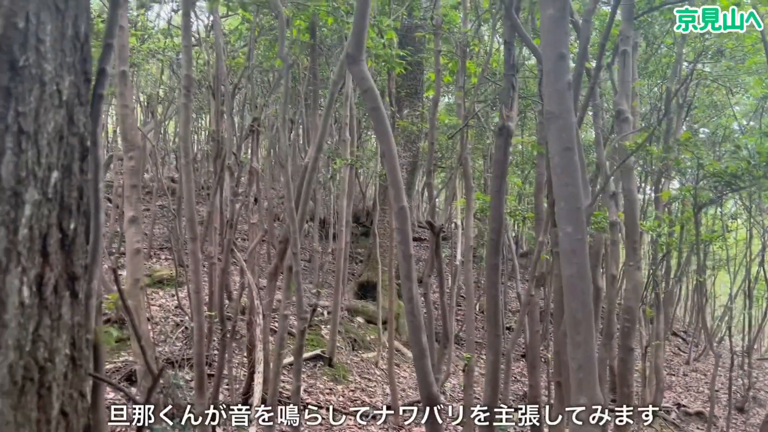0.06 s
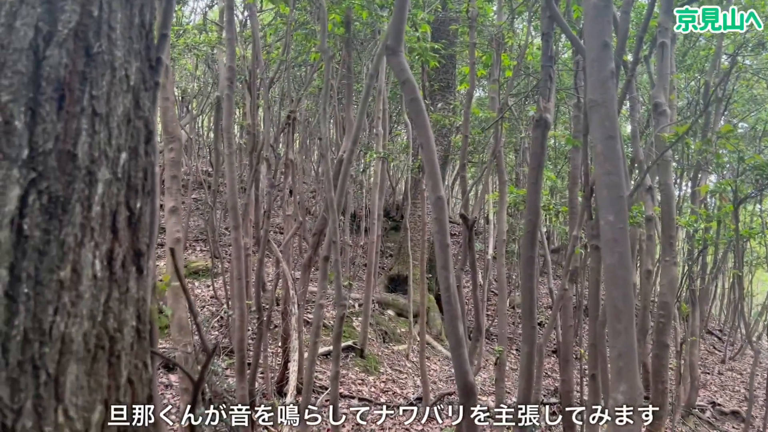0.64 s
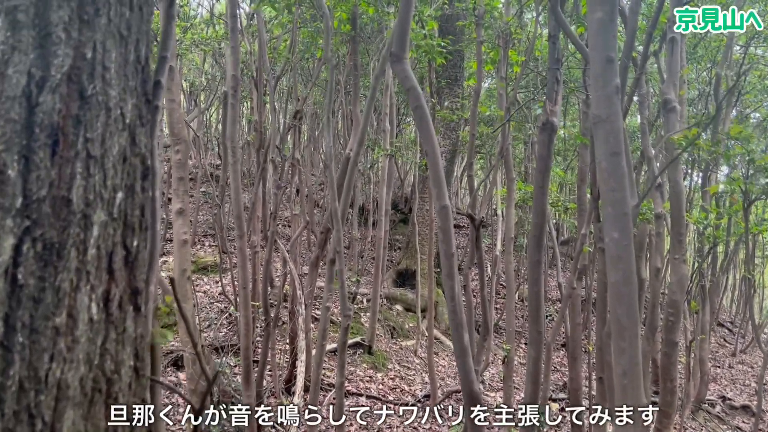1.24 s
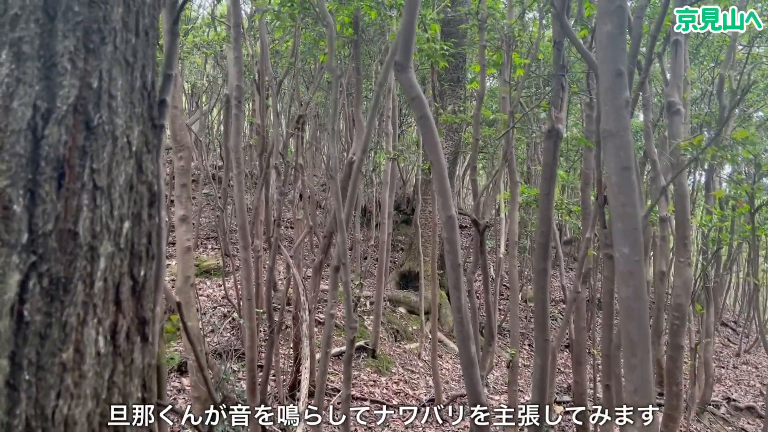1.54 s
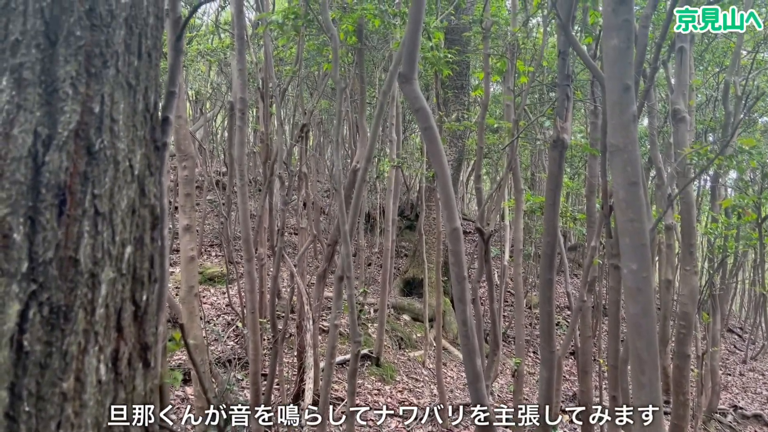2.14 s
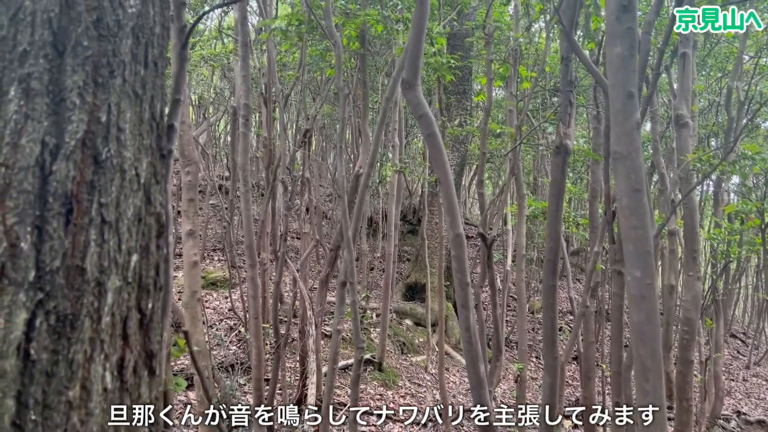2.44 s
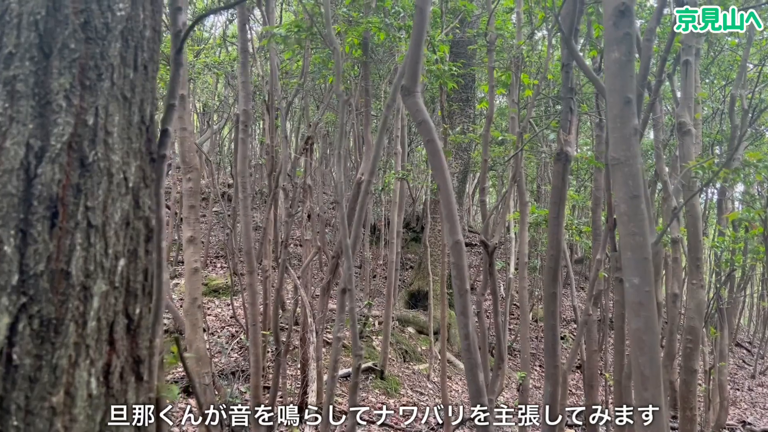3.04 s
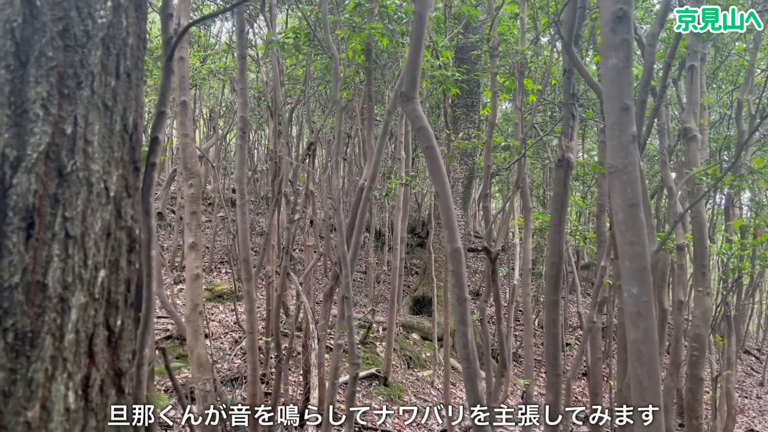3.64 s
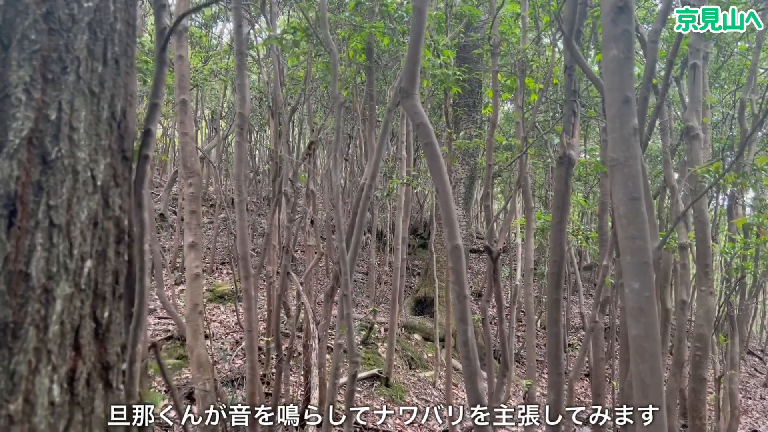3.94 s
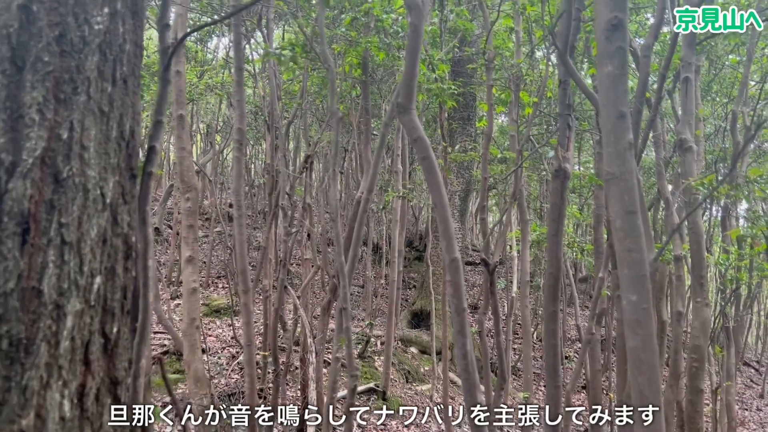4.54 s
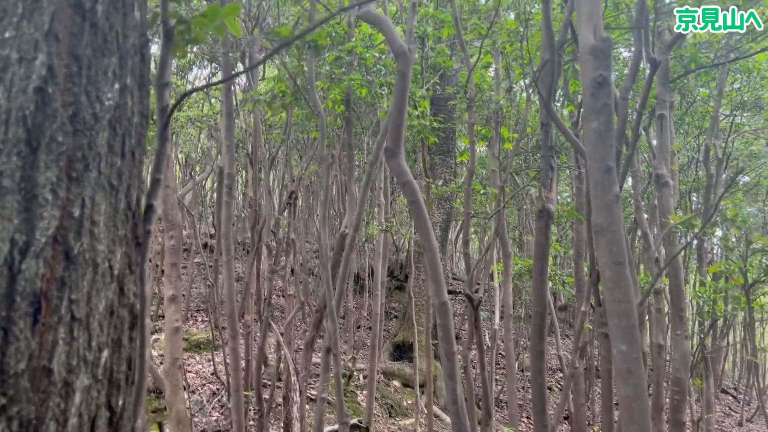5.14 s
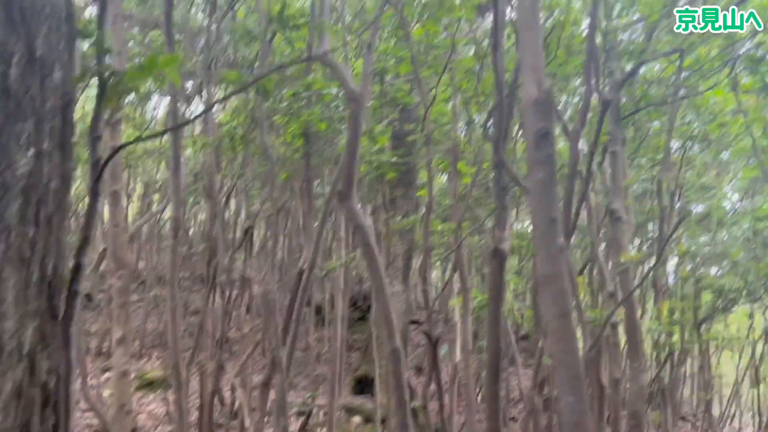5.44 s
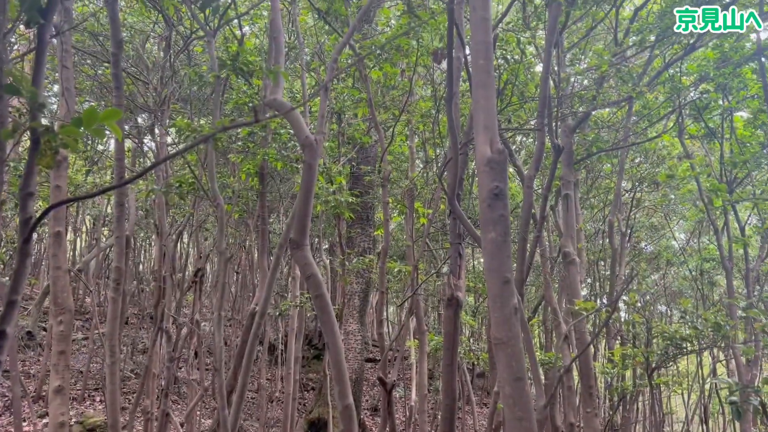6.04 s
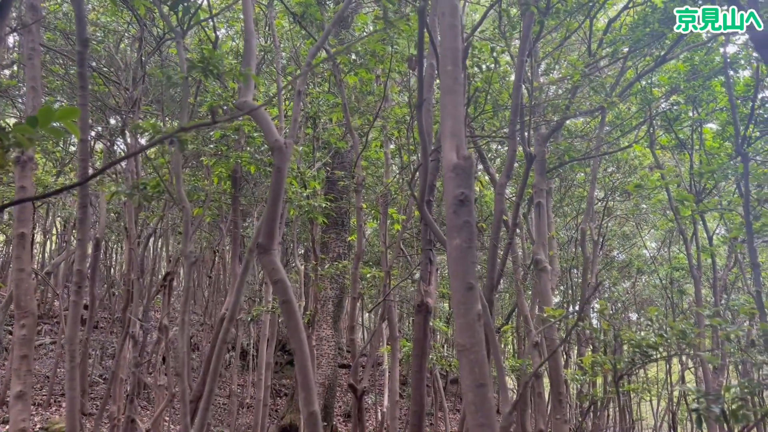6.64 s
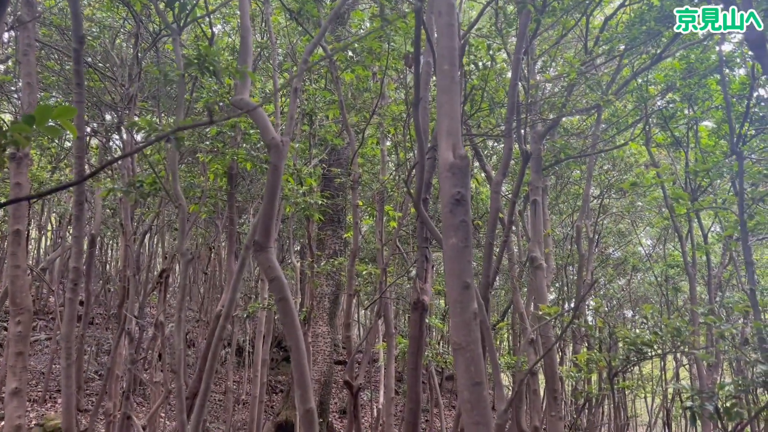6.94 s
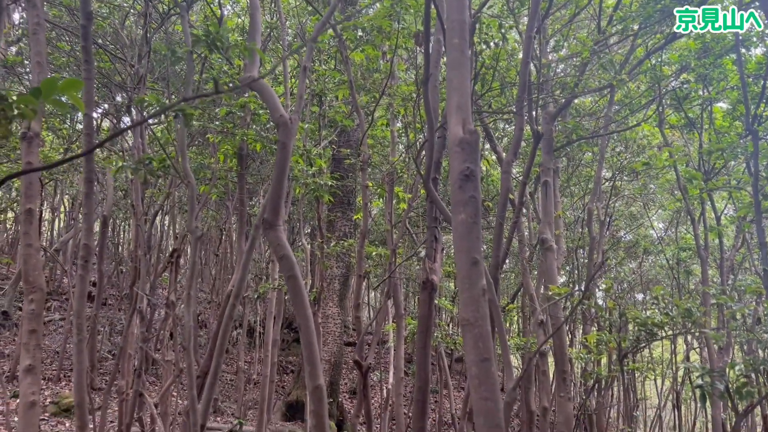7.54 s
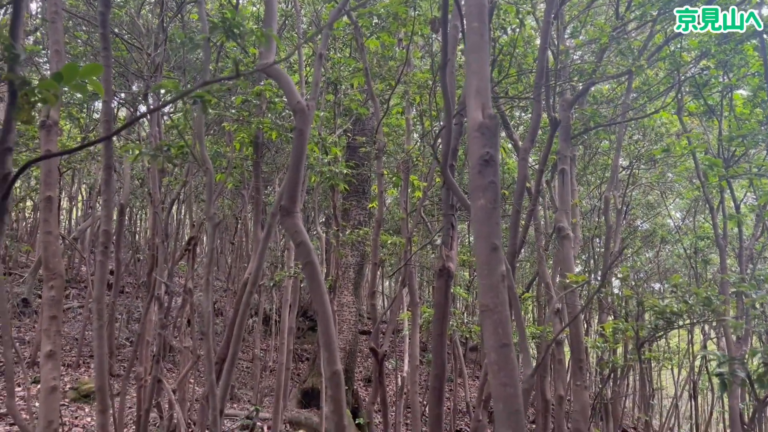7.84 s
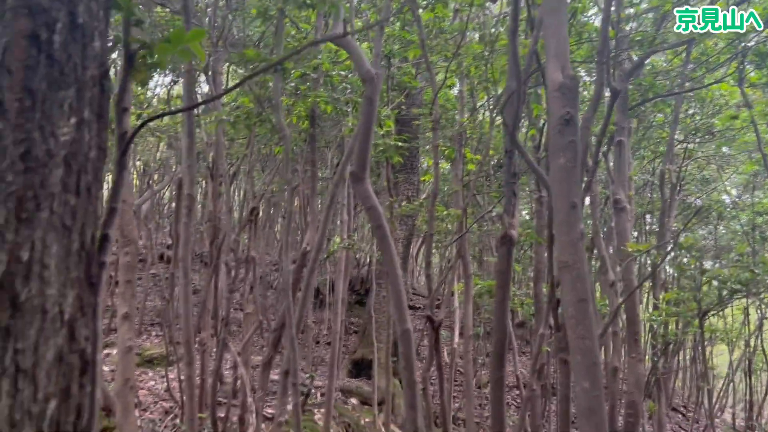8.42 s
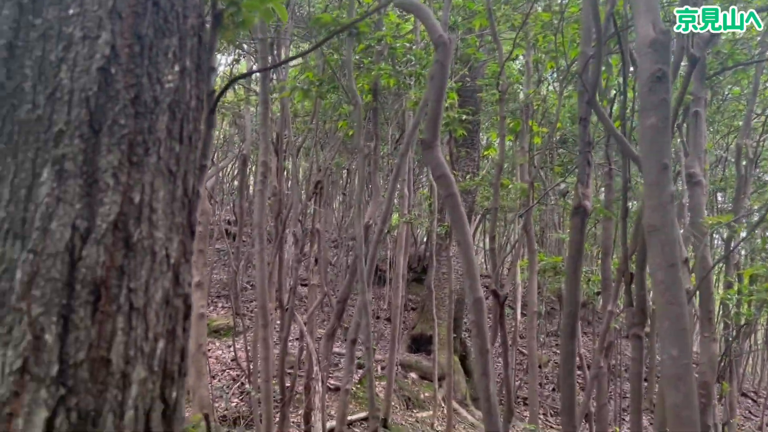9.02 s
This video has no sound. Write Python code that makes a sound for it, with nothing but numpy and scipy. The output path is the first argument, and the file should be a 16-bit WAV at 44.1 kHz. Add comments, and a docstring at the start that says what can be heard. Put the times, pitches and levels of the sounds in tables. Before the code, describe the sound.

A stick raps a trunk in three short bursts, with bark rubbing nearby and small birds whistling far off.

```python
"""Stick knocks on a tree trunk

A stick knocks three runs of five beside a two-port microphone: each blow is a crack of crushed bark
on a thud of heavy wood, and the trees scatter it back. Rough bark rubs, scuffs and crackles around
the runs. Small birds whistle some way off, over a bed of distant rumble and soft hiss."""
import sys
import numpy as np
from scipy import signal
from scipy.fft import rfft, irfft
from scipy.io import wavfile
from scipy.ndimage import uniform_filter1d

SR = 44100
rng = np.random.default_rng(int(sys.argv[2]) if len(sys.argv) > 2 else 0)


def wav_record(signal):
    """Record a signal, one row per channel, as 16-bit PCM in the file named by sys.argv[1]."""
    frames = np.transpose(np.atleast_2d(signal))
    bounded = np.clip(frames, -1, 1)
    # unit amplitude maps onto the largest positive 16-bit level
    quanta = np.round(bounded * 32767).astype(np.int16)
    wavfile.write(sys.argv[1], SR, quanta)


N = 409248
TIME = np.arange(N) / SR
BINS_HZ = np.fft.rfftfreq(N, 1 / SR)
TURN_S = 5.5  # from here on the knocks are heard with the microphone turned aside

# tone of the far rumble and of the background hiss: f/Hz, level/dB
RUMBLE_EQ = [(22, -32), (40, -9.5), (69, -1), (113, -8), (156, -17), (199, -18.5), (330, -36), (430, -61.5),
             (700, -120)]
HISS_EQ = [(160, -27.5), (290, -2.5), (500, -9.5), (930, -13.5), (1250, -19), (1750, -17.5), (2300, -27),
           (4500, -25.5), (7000, -27.5), (9500, -35), (13000, -37.5), (16000, -47)]
# stereo image of that bed: f/Hz, left-right correlation
BED_CORRELATION = [(60, 0.99), (130, 0.83), (290, 0.54), (640, -0.33), (1400, -.2), (3100, -0.38),
                   (15000, -0.016)]
# decay of the forest echo, before each sound scales it: f/Hz, t60/s
FOREST_DECAY = [(200, 0.35), (900, 0.19), (2500, 0.23), (5500, 0.3), (12000, 0.19)]

# slow rubs on the bark, one fader curve each: t/s, level/dB
RUB_CURVES = [
    [(0, -46), (.45, -48.5), (.95, -51), (1.07, -47), (1.32, -57), (1.7, -50), (1.9, -83)],
    [(3.0, -75), (3.3, -59), (4.0, -63.5), (4.4, -70.5), (4.65, -70), (5.2, -69.5), (5.45, -77.5)],
]
# quick scrapes: t/s, hold/s, hiss/dB, woody body/dB
SCRAPE_STROKES = [(8.684, 0.075, -46.5, -50), (8.916, 0.07, -44, -53), (9.08, 0.12, -40.5, -46),
                  (9.164, 0.054, -53, -52)]
# tone of rubbed bark: f/Hz, level/dB
BARK_EQ = [(150, -6), (400, -9), (1000, -7.5), (2000, -6), (3200, -8), (5000, -5), (6800, 3), (9400, -4),
           (12000, -2.5), (15500, -8.5)]
# pan of contact close to the microphone: f/Hz, left over right/dB
CLOSE_PAN = [(290, 0), (1400, 3.5), (4500, 3), (6800, 7.5), (9000, 1.5)]
# bark catching and crunching: t/s, level/dB, grind/s, woody low shelf/dB
SCUFF_HITS = [(0.0834, -11, 0.0011, 1), (0.2631, -5.5, 0.0024, -21), (0.4052, -7, 0.003, -18),
              (0.457, -6.5, 0.012, 1), (0.6235, 3.5, 0.0038, 8), (0.632, -11, 0.0022, 15),
              (0.67, -16, 0.0007, -21), (0.8169, -6.5, 0.0045, 4), (0.852, -0.5, 0.0071, 7),
              (0.89, -12, 0.0045, 11), (1.012, -14.5, 0.005, 18), (1.372, -5.5, 0.0042, 6),
              (1.5635, -8, 0.002, -13), (6.944, -10, 0.012, 7.5), (8.312, -22.5, 0.022, 8),
              (8.6781, -8.5, 0.0093, 4), (8.6961, 5, 0.005, -5), (8.714, -3.5, 0.0047, 6),
              (8.727, -0.5, 0.0062, 8), (8.932, 0, 0.014, -9), (9.076, 6.5, 0.0091, -3.5)]
# clearest snaps of bark flakes and dry leaves: t/s, relative level/dB, centre/Hz
SNAP_HITS = [(2.8836, -40, 8700), (3.0752, -39.5, 3440), (3.9495, -38, 6700), (4.1928, -36, 8550),
             (4.2812, -31.5, 8240), (4.7524, -43, 7440), (4.9928, -35.5, 6350), (5.1984, -44.5, 7140),
             (7.43, -37.5, 6740), (8.0735, -35, 6900)]
# spells of random snaps: start/s, end/s, relative level/dB
SNAP_SPELLS = [(0, 1.198, -35), (3.131, 4.798, -45.5)]

# stick on trunk: t/s, thud/dB, lean to the boom/dB, crack/dB, crack tilt/(dB per octave),
# then f/Hz, lift/dB for each of the struck spot's low, middle and high notes
BLOWS = [(0.121, 12, 0.5, 8, 3, 821, 4.2, 2080, 7.5, 3230, 5.5),
         (0.2927, 9.5, -2.5, 9.0, 3.5, 398, 8.9, 2210, 8.5, 3680, 11.5),
         (0.4884, 10, 2.5, 3, 2.5, 1036, 8.0, 2700, 8.5, 3496, 15),
         (0.68, 17, -2.5, 12.5, 3.5, 540, 3.9, 3210, 3.5, 4760, 7),
         (1.012, -3.5, 12, -20, 1, 1078, 9.1, 1974, -16, 7850, 20),
         (1.029, -15, -9, -25.5, 1, 854, 5.4, 1300, 2, 4000, 2.5),
         (3.4661, 15.5, -1.0, 11.5, 1.5, 681, 6.4, 2620, 11.5, 6220, 3),
         (3.6512, 11, 1, 0.5, -1, 920, 11, 2970, 11, 8640, 7),
         (3.828, 13.5, 1.5, 1, 3.0, 984, 9.2, 1740, 1, 5630, 3),
         (4.0174, 11, 2.5, 1, 2, 436, 3.0, 2700, 6.5, 4550, 6.5),
         (4.217, 15, 3.5, 6, 4, 755, 4.5, 1640, -1, 4280, 6),
         (6.727, 8, 8, 4, 0.5, 1064, 1.5, 2120, 8.5, 9230, 3.5),
         (6.924, 1.5, 7.5, -3.5, -3.5, 631, 13.5, 1640, 2, 3100, 3),
         (7.1168, 7, 4.5, -1.0, -1.5, 1320, 3.7, 3100, 3.5, 3850, 7),
         (7.2996, 8.5, 7.5, 8, -4.5, 433.5, 5.4, 1530, -2.5, 5500, 7.5),
         (7.4962, 13, 2.5, 9.5, -0.5, 950, 2.5, 2860, 7.5, 3950, 9)]
# wood resonances and the hollows between them: f/Hz, width/Hz, level/dB
WOOD_MODES = [(292, 90, -3), (770, 180, -0.5), (950, 480, 10), (1680, 530, 4.5), (2420, 390, -5.5),
              (3370, 650, -0.5), (4170, 580, -5.5), (4760, 830, 4.1), (6300, 880, 3)]
# tone of the bark crack, microphone facing the trunk and turned aside: f/Hz, level/dB
CRACK_EQ_FACING = [(1800, 6), (3500, -0.5), (6300, -0.3), (12000, -5), (15000, -11)]
CRACK_EQ_ASIDE = [(1800, 3), (3500, 1), (6300, -4.5), (12000, 7.5), (15000, -1.1)]
# bands that cancel or add with the microphone aside: f/Hz, width/Hz, level/dB
ASIDE_BELLS = [(470, 150, -10.5), (2800, 640, -4.5), (3510, 920, 4.5)]
# pan of the trunk, facing and aside: f/Hz, left over right/dB
PAN_FACING = [(400, 0), (800, -4.5), (1100, 0), (1800, 2), (2200, -2), (2900, -8), (4000, -3), (4600, 5.5),
              (6000, 3), (7100, 6), (8000, 0)]
PAN_ASIDE = [(200, 0), (500, -5), (850, -4), (1500, 2.5), (3500, -4), (4600, 4), (6500, 4), (8000, 0)]
# lag of the left port beyond the travel time, facing and aside: f/Hz, phase/rad
PHASE_FACING = [(100, -0.5), (450, 1.47), (2200, 1.3), (4200, -1.5), (5500, 1.3), (6500, -0.3), (7600, 3.5),
                (16000, 4.5)]
PHASE_ASIDE = [(100, 0), (500, .7), (1000, 0), (2200, 0), (4200, -.7), (6000, 0), (8000, 3.7)]
# echo send of the knocks, one point a run: t/s, level/dB
ECHO_SEND = [(.7, -18), (3.8, -14), (7.1, -13)]

# low birds stepping up and down in slurs: t/s, f/Hz, glide/octaves, level/dB
SLUR_NOTES = [(1.7, 2610, -.03, -63.5), (1.85, 2300, .3, -63.5), (2.08, 3220, -0.073, -66.5),
              (2.18, 2810, -0.0041, -60), (2.41, 2450, .25, -67.5), (2.48, 4130, 0, -74.5),
              (2.57, 2750, -0.05, -68), (2.77, 2880, 0.07, -64), (2.92, 2150, 0.14, -70),
              (5.54, 3600, -.05, -69), (5.76, 2600, 0.203, -69.5), (5.88, 2500, 0.306, -72),
              (6.37, 2200, .15, -68)]
# a high bird's chips, dips and falls: t/s, length/s, f/Hz, glide/octaves, arch/octaves, level/dB
HIGH_SONG = [(5.013, .045, 6550, -.25, .05, -58), (5.06, .1, 4500, -.35, 0, -63),
             (5.22, .055, 4250, -.4, 0, -64), (5.78, .07, 4750, -.22, 0, -66),
             (5.992, .026, 5720, .06, .02, -54), (6.016, .021, 6450, -.1, .17, -50.5),
             (6.038, .05, 4850, -.18, 0, -60), (6.093, .05, 4030, -.04, -.16, -52),
             (6.142, .022, 5500, .03, .1, -53.5), (6.304, .03, 6130, .1, .06, -52),
             (6.335, .135, 3860, -.22, -.015, -56.5)]
# see-saw call (high rise, low rise, flat note): t in phrase/s, length/s, f/Hz, glide/octaves, level/dB
SEESAW_PHRASE = [(0, .1, 4830, .36, -62.5), (.13, 0.099, 3920, .3, -64.5), (0.201, .05, 4385, -.04, -63)]

# two narrow cuts near 10 and 14 kHz that thin the treble: f/Hz, width/Hz, level/dB
TREBLE_NOTCHES = [(10290, 930, -16), (14400, 720, -13.5)]


def amp(db):
    """Decibels to gain."""
    return 10 ** (np.asarray(db) / 20)


def unit(x):
    """Scales to rms 1."""
    return x / np.sqrt(np.mean(x ** 2) + 1e-20)


def curve(points, hz):
    """Reads a table on a log-frequency axis."""
    f, value = np.transpose(points)
    return np.interp(np.log(hz + 1), np.log(f + 1), value)


def bells(bands, hz):
    """Level in dB of a set of bell boosts and cuts."""
    return sum(db / (1 + (2 * (hz - f) / width) ** 2) for f, width, db in bands)


def add(mix, s, sound):
    """Mixes a sound in at time s."""
    part = mix[..., max(round(s * SR), 0):][..., :sound.shape[-1]]
    part += sound[..., :part.shape[-1]]


def eq(x, gain):
    """Filters a whole track by a gain for each frequency."""
    return irfft(rfft(x) * gain, N)


def coloured(burst, colour_db, smooth_bins=70, size=4096):
    """Gives a burst the spectrum colour_db(hz) by a minimum-phase filter, leaving its fine ripple."""
    hz, spectrum = np.fft.rfftfreq(size, 1 / SR), rfft(burst, size)
    outline = np.sqrt(abs(uniform_filter1d(abs(spectrum) ** 2, size=smooth_bins)) + 1e-12)
    log_gain = np.log(amp(colour_db(hz)) / outline)
    causal = np.conj(signal.hilbert(np.r_[log_gain, log_gain[-2:0:-1]]))[:len(hz)]
    return irfft(spectrum * np.exp(causal), size)


def panned(x, pan, lag_rad=0):
    """The housing shades each port by band: an equal-power pan, with an optional lag on the left."""
    lean = amp(curve(pan, BINS_HZ))
    left_right = np.array([lean * np.exp(-1j * lag_rad), np.ones(len(lean))])
    return eq(x, left_right * np.sqrt(2 / (1 + lean ** 2)))


def bed_noise(tone):
    """Stereo noise whose width changes from band to band."""
    correlation = np.clip(curve(BED_CORRELATION, BINS_HZ), -1, 1)
    gain = amp(curve(tone, BINS_HZ))
    mid = eq(rng.standard_normal(N), gain * np.sqrt(1 + correlation))
    side = eq(rng.standard_normal(N), gain * np.sqrt(1 - correlation))
    return unit(np.array([mid + side, mid - side]))


def rumble(level_db=-40.5, drone_hz=88, drone_db=-47):
    """A far rumble with a wavering drone of narrow-band noise in it."""
    drone = unit(eq(rng.standard_normal(N), np.exp(-((BINS_HZ - drone_hz) / 4) ** 2)))
    return amp(level_db) * bed_noise(RUMBLE_EQ) + amp(drone_db) * drone


def background_hiss(level_db=-57, patchy_db=2.0):
    """A soft background hiss that swells and sinks slightly in random patches."""
    bands = signal.stft(bed_noise(HISS_EQ), nperseg=1024)[2]
    patches = uniform_filter1d(rng.standard_normal(bands.shape[1:]), size=7, axis=0)  # across bands
    patches = unit(uniform_filter1d(patches, size=16, axis=1))  # across time
    hiss = signal.istft(bands * amp(patchy_db * patches), nperseg=1024)[1]
    return amp(level_db) * unit(hiss[:, :N])


def forest(x, t60_scale, onset_s):
    """Countless trunks each return a faint echo; every band dies at its own speed."""
    taps = rng.standard_normal((2, SR // 2)) * (rng.random((2, SR // 2)) < .2)
    hz, t, bands = signal.stft(taps, SR, nperseg=256)
    decay = amp(-60 * t / (t60_scale * curve(FOREST_DECAY, hz)[:, None]))
    build_up = 1 - np.exp(-(t / onset_s) ** 2)
    tail = signal.istft(bands * decay * build_up, SR, nperseg=256)[1]
    return signal.fftconvolve(x[None], tail / np.linalg.norm(tail[0]), axes=1)[:, :N]


def rub_faders(usual_hiss_db=-55, usual_body_db=-59.5, follow=0.64, attack_s=0.0079, release_s=0.081):
    """Gains of hiss and woody body: slow rubs swell and fade, scrapes rise, hold and die away."""
    rubs = [np.interp(TIME, *np.transpose(rub), left=-140, right=-140) for rub in RUB_CURVES]
    rub_db = np.max(rubs, axis=0)
    hiss = amp(rub_db)
    body = amp(usual_body_db + follow * (rub_db - usual_hiss_db))
    for s, hold_s, hiss_db, body_db in SCRAPE_STROKES:
        attack = np.clip((TIME - s) / attack_s, 0, 1)
        stroke = attack * np.exp(-np.maximum(TIME - s - hold_s, 0) / release_s)
        hiss += amp(hiss_db) * stroke
        body += amp(body_db) * stroke
    return hiss, body


def rubbing(grains_per_s=1300, grain_s=.0017, spread_db=6.0, split_hz=3200, body_trim_db=0.5):
    """Sliding over bark ridges sheds a stream of tiny clicks of very unequal size."""
    hiss_gain, body_gain = rub_faders()
    sizes = amp(spread_db * np.minimum(rng.exponential(1, N), 5))
    clicks = sizes * (rng.random(N) < grains_per_s / SR)
    grain_power = signal.oaconvolve(clicks ** 2, np.exp(-TIME[:400] / grain_s))[:N]
    grit = unit(np.sqrt(abs(grain_power)) * rng.standard_normal((2, N)))
    friction = grit + rng.standard_normal((2, N))
    bark = amp(curve(BARK_EQ, BINS_HZ))
    highs = 1 / (1 + (split_hz / (BINS_HZ + 1)) ** 4)
    hiss = hiss_gain * unit(eq(friction, bark * highs))
    body = amp(body_trim_db) * body_gain * unit(eq(friction, bark * (1 - highs)))
    rub = hiss + body
    return panned(rub, CLOSE_PAN) + amp(-11.5) * forest(rub[0], t60_scale=0.22, onset_s=0.0048)


def crunch(grind_s, ring_db, ring_s, attack_s=0.00042, size=3000):
    """Bark crushes in a dense burst of tiny breaks; the wood rings on briefly."""
    t = np.arange(size) / SR
    decay = np.hypot(np.exp(-t / grind_s), amp(ring_db) * np.exp(-t / ring_s))
    return np.minimum(t / attack_s, 1) * decay * rng.standard_normal(size)


def scuffs():
    """Rough bark catches and crunches, now woody, now thin."""
    track = np.zeros(N)
    for s, db, grind_s, woody_db in SCUFF_HITS:
        tone = lambda hz: curve(BARK_EQ, hz) + woody_db * curve([(1200, 1), (4500, 0)], hz)
        add(track, s, amp(db) * coloured(crunch(grind_s, ring_db=-29.5, ring_s=0.019), tone))
    return track


def snaps(trim_db=19.5, per_spell=14, spread_db=6, crackle_hz=6964):
    """Bark flakes and dry leaves break in tiny bright ticks."""
    track = np.zeros(N)
    crackle = [(rng.uniform(start, end), rng.normal(db, spread_db), crackle_hz)
               for start, end, db in SNAP_SPELLS for _ in range(per_spell)]
    for s, db, centre_hz in list(SNAP_HITS) + crackle:
        tone = lambda hz: -np.minimum(9 * np.log2((hz + 1) / centre_hz) ** 2, 22)
        tick = crunch(grind_s=0.000091, ring_db=-25, ring_s=0.0031)
        add(track, s, amp(db + trim_db) * coloured(tick, tone))
    return track


def bark_crackle():
    """Scuffs and snaps sit close on the left, and the trees scatter them back."""
    close = scuffs() + snaps()
    return panned(close, CLOSE_PAN) + amp(-6) * forest(close, t60_scale=0.74, onset_s=0.0013)


def blow(aside, thud_db, depth_db, crack_db, tilt, spot_notes, boom_hz=323, clack_hz=855, split_hz=1300):
    """Bark cracks at once, the heavy wood rings longer; returns the direct hit and its echo feed."""
    boom_db = thud_db + depth_db
    thud_eq = [(60, boom_db - 14), (boom_hz, boom_db), (clack_hz, thud_db - depth_db)]
    crack_eq = [(f, crack_db + db + tilt * np.log2(f / 4700))
                for f, db in (CRACK_EQ_ASIDE if aside else CRACK_EQ_FACING)]
    # the struck plate of bark adds its own notes
    spot = [(f, 0.24 * f, db) for f, db in zip(spot_notes[::2], spot_notes[1::2])]
    modes = list(WOOD_MODES) + spot + (list(ASIDE_BELLS) if aside else [])
    outline = lambda hz: curve(thud_eq + crack_eq, hz)
    lows = lambda hz: 1 / (1 + (hz / split_hz) ** 4)
    bark_tone = lambda hz: outline(hz) + bells(modes, hz) + 10 * np.log10(1 - lows(hz) + 1e-4)
    wood_tone = lambda hz: outline(hz) + bells(modes, hz) + 10 * np.log10(lows(hz) + 1e-4)
    crack = coloured(crunch(grind_s=0.00025, ring_db=-21.5, ring_s=0.0036), bark_tone, smooth_bins=24)
    thud = coloured(crunch(grind_s=0.0035, ring_db=-16, ring_s=0.0058), wood_tone, smooth_bins=20)
    hit = crack + thud
    # over all the directions in which the trunk radiates, its notes partly even out
    radiated = coloured(hit, lambda hz: outline(hz) + bells(modes, hz) / 4, smooth_bins=24)
    return hit, radiated


def ports(x, pan, phase, travel_s=.000282):
    """Sound from the trunk reaches the right port first."""
    return panned(x, pan, 2 * np.pi * BINS_HZ * travel_s + curve(phase, BINS_HZ))


def knocks(ground_db=-10.5, around_db=-3):
    """The stick strikes the trunk and the forest answers each blow."""
    trunk, wide = np.zeros(N), np.zeros((2, N))
    for s, thud_db, depth_db, crack_db, tilt, *spot_notes in BLOWS:
        hit, radiated = blow(s >= TURN_S, thud_db, depth_db, crack_db, tilt, spot_notes)
        add(trunk, s, hit)
        # early scatter from the ground and nearest stems
        add(wide, s, amp(ground_db) * forest(radiated, t60_scale=0.24, onset_s=0.0034))
        # part of the echo comes from the trunk's side, the rest from all around
        send = amp(np.interp(s, *np.transpose(ECHO_SEND))) * radiated
        add(trunk, s, forest(send, t60_scale=0.52, onset_s=0.017)[0])
        add(wide, s, amp(around_db) * forest(send, t60_scale=1.54, onset_s=0.0067))
    facing = ports(trunk * (TIME < TURN_S), PAN_FACING, PHASE_FACING)
    aside = ports(trunk * (TIME >= TURN_S), PAN_ASIDE, PHASE_ASIDE)
    return facing + aside + wide


def slur(s, length_s, hz, octaves, db, bend=.12):
    """A note that slides quickly and levels off, laid out like a row of HIGH_SONG."""
    return s, length_s, hz, octaves, bend * octaves, db


def far_chorus(start_s=0.88, span_s=5.4, low_hz=2300, range_oct=0.62, glide_oct=0.68, db=-75, count=26):
    """The farthest birds warble at random, in short upward slurs."""
    return [slur(start_s + span_s * when, 0.075 + 0.03 * length,
                 low_hz * 2 ** (range_oct * pitch ** 2), glide_oct * (rise + .5), db)
            for when, length, pitch, rise in rng.random((count, 4))]


def near_songs(slur_s=0.1, seesaw_start_s=6.388, period_s=.415, repeats=4):
    """The notes of the nearer birds: low slurs, the high song, then the see-saw."""
    slurs = [slur(s, slur_s, *note) for s, *note in SLUR_NOTES]
    seesaw = [slur(seesaw_start_s + k * period_s + s, *note)
              for k in range(repeats) for s, *note in SEESAW_PHRASE]
    return slurs + list(HIGH_SONG) + seesaw


def birds(direct_db=-3, echo_db=-2, near_db=-54, overtone_db=-19, flutter_db=3):
    """Whistles glide, arch and flutter; the fainter the bird, the more of it arrives as echo."""
    direct, send = np.zeros(N), np.zeros(N)
    for s, length_s, middle_hz, glide_oct, arch_oct, db in near_songs() + far_chorus():
        along = np.linspace(-1, 1, max(round(length_s * SR), 300))
        drift = unit(uniform_filter1d(rng.standard_normal((2, SR // 2)), size=60))
        pitch_drift, level_drift = drift[:, :len(along)]
        presence = min(amp(0.82 * (db - near_db)), 1)
        waver = presence * .008 + (1 - presence) * .028  # faint notes waver more
        contour_oct = glide_oct * along / 2 - arch_oct * along ** 2
        hz = middle_hz * 2 ** contour_oct * (1 + waver * pitch_drift)
        phase = 2 * np.pi * np.cumsum(hz) / SR
        whistle = np.sin(phase) + presence * amp(overtone_db) * np.sin(2 * phase)
        envelope = amp(flutter_db * level_drift) * signal.windows.tukey(len(along), .3)
        note = amp(db) * unit(whistle * envelope)
        add(direct, s, presence * note)
        add(send, s, (1.55 - presence) * note)
    return amp(direct_db) * direct + amp(echo_db) * forest(send, t60_scale=1.25, onset_s=.006)


def scene():
    """The mix beside the trunk, from foreground to bed."""
    return knocks() + bark_crackle() + rubbing() + birds() + rumble() + background_hiss()


def record(dry, cutoff_hz=16200):
    """Two narrow cuts thin the treble, the hardest knocks clip, and a low-pass trims the top."""
    notched = eq(dry, amp(bells(TREBLE_NOTCHES, BINS_HZ)))
    low_pass = signal.firwin(255, cutoff_hz, window=("kaiser", 8), fs=SR)
    return signal.oaconvolve(np.clip(notched, -1, 1), low_pass[None], "same", axes=1)


dry = scene()
out = record(dry)
wav_record(out)
```